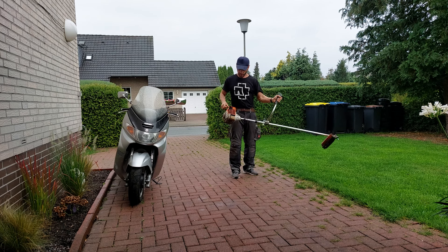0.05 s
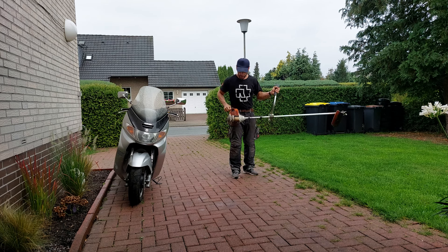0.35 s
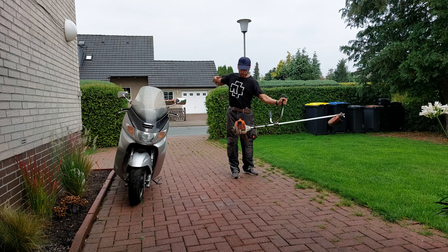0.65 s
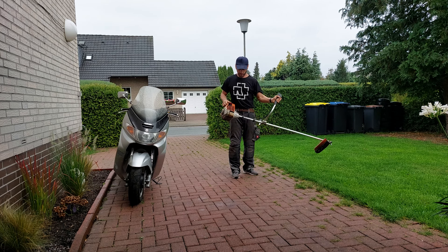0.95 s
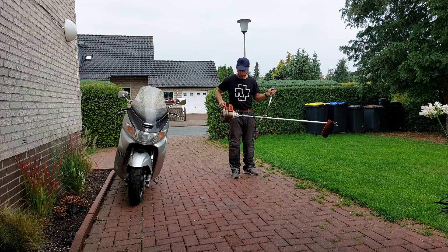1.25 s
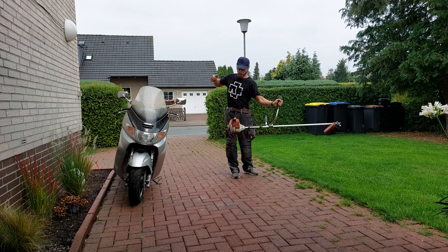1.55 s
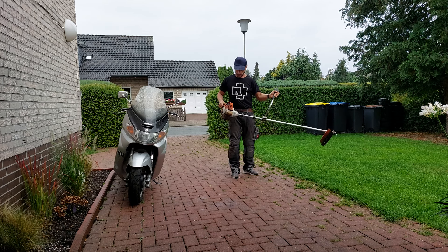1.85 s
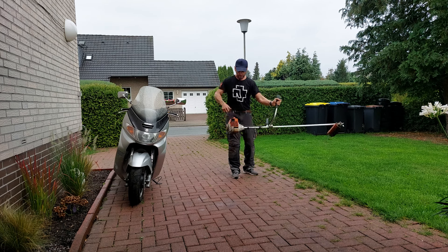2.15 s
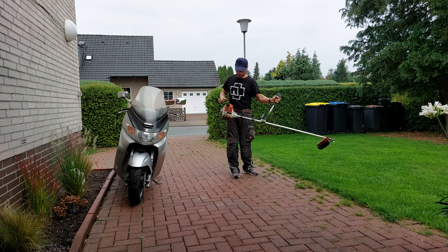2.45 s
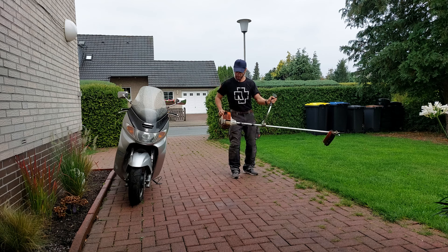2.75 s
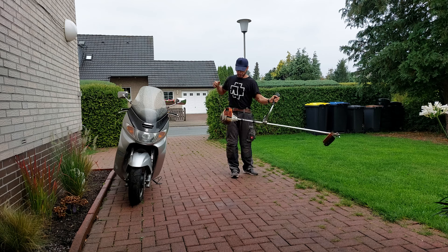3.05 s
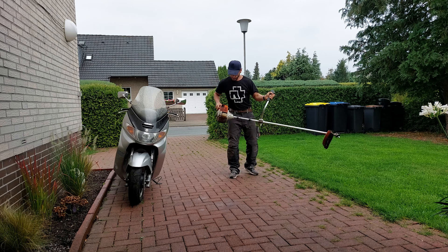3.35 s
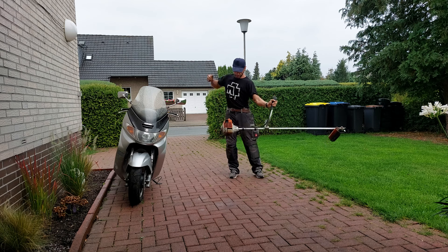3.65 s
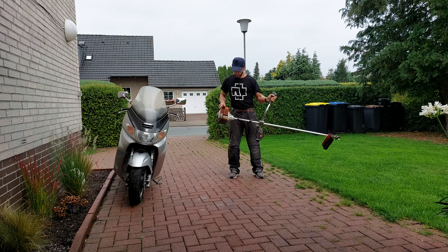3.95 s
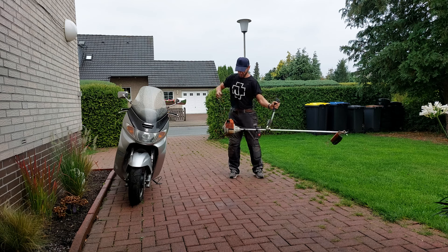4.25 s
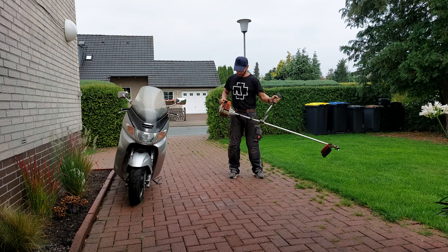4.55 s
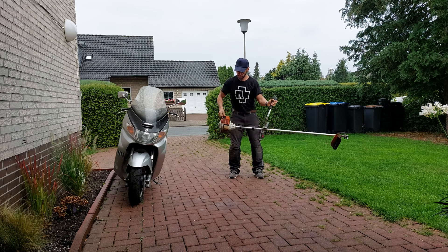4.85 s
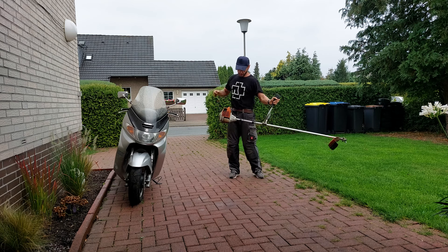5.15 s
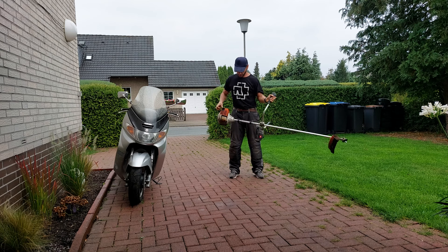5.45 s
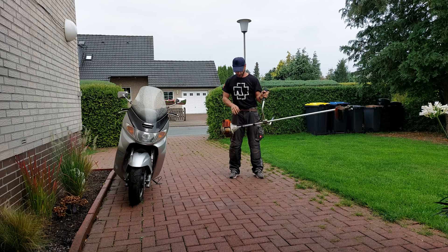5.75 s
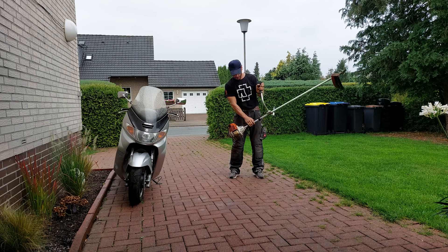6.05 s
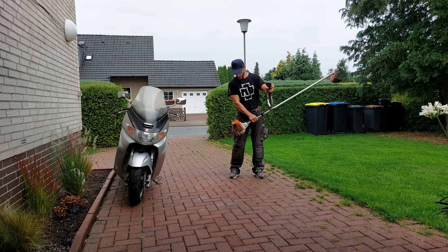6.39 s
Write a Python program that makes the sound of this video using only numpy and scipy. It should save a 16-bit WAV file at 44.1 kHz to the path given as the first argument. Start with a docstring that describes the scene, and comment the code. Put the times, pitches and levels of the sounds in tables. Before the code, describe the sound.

Repeated starter cord pulls on a brushcutter give short, airy puffs and a rattling rewind, without the engine catching, over faint traffic.

```python
"""A brushcutter's cold two-stroke engine is pull-started again and again and never fires.
On each pull the pawls (small catches) grab the flywheel, the rope whirrs, and the piston pumps two
strong puffs a turn through the muffler. Then a spring rewinds the rope and the handle knocks home.
Cord and harness rustle, house walls echo around the paved yard, and distant traffic slowly swells."""
import sys
import numpy as np
from scipy import signal
from scipy.fft import rfft, irfft, next_fast_len
from scipy.io import wavfile
from scipy.ndimage import map_coordinates

SR = 44100
rng = np.random.default_rng(int(sys.argv[2]) if len(sys.argv) > 2 else 0)


def wrap_up_sound(samples):
    """Save the sound to the file named by the first command line argument, as 16-bit audio."""
    columns = np.atleast_2d(samples).T
    # keep every value between -1 and 1, then stretch to whole-number steps
    tamed = np.clip(columns, -1, 1)
    steps = np.round(tamed * 32767).astype(np.int16)
    wavfile.write(sys.argv[1], SR, steps)


N = 287532


def amp(db):
    """Turn decibels into a gain."""
    return 10 ** (np.asarray(db) / 20)

def unit(x):
    """Scale a signal to an average (rms) level of 1."""
    return x / np.sqrt(np.mean(x ** 2) + 1e-20)

def along(points, hz):
    """Read between the rows of a (frequency, value) table, on a log frequency scale."""
    freqs, values = np.transpose(points)
    return np.interp(np.log(hz + 1), np.log(freqs), values)

def wobble(rate, size):
    """A smooth curve through `rate` random values a second."""
    steps = np.arange(0, size * rate / SR + 1, 1 / 8)
    values = rng.standard_normal(int(size * rate / SR) + 4)
    return np.interp(np.arange(size) * rate / SR, steps, map_coordinates(values, [steps]))

def filtered(x, response):
    """Scale each frequency in x by response(frequency)."""
    size = x.shape[-1]
    padded = next_fast_len(size + 8192)
    return irfft(rfft(x, padded) * response(np.fft.rfftfreq(padded, 1 / SR)), padded)[..., :size]

def ring(spectrum, size=8192):
    """How a body with this spectrum rings after one tap, with a peak of 1."""
    cepstrum = irfft(np.log(amp(along(spectrum, np.fft.rfftfreq(size, 1 / SR))) + 1e-6))
    cepstrum[1:size // 2] *= 2  # folding it puts all the ringing after the tap
    cepstrum[size // 2 + 1:] = 0
    response = irfft(np.exp(rfft(cepstrum)))
    return response / np.abs(response).max()

# How alike left and right are: (frequency [Hz], likeness [0 to 1])
STEREO_LIKENESS = [(60, .98), (130, 0.93), (290, 0.84), (640, 0.26), (1400, 0), (3100, 0.44), (7000, 0)]
def noise(spectrum, size):
    """Stereo noise of level 1, alike on both sides in the bass and mostly unrelated in the treble."""
    def shape(hz):
        angle = np.arccos(np.clip(along(STEREO_LIKENESS, hz), -1, 1)) / 2
        return amp(along(spectrum, hz)) * [np.cos(angle), np.sin(angle)]
    mid, side = filtered(rng.standard_normal((2, size)), shape)
    return unit(np.array([mid + side, mid - side]))

def fuzzy_tone(hz, width, size):
    """A narrow band of noise around a pitch, at level 1."""
    phase = 2 * np.pi * np.cumsum(hz * np.ones(size)) / SR
    return unit(wobble(width, size) * np.cos(phase) + wobble(width, size) * np.sin(phase))

def fade(t, t60):
    """Start at t = 0 and die away by 60 dB every t60 seconds (the fade time)."""
    return (t >= 0) * np.exp(-np.log(1000) * np.abs(t) / t60)

def swell(t, peak, width):
    """A smooth rise and fall, 1 at the peak."""
    return np.exp(-((t - peak) / width) ** 2)

def add(track, s, x):
    """Mix x into the track from s seconds on."""
    start = round(s * SR)
    x = x[:, max(-start, 0):max(N - start, 0)]
    track[:, max(start, 0):][:, :x.shape[1]] += x

# How long the yard echoes: (frequency [Hz], fade time [s])
TAIL_FADE = [(100, 0.74), (300, 0.49), (1200, 0.34), (5000, 0.44), (14000, 0.29)]
# The echo's tail, and the single echo off the house front: (frequency [Hz], level [dB])
TAIL_TONE = [(100, -1), (350, -3.5), (900, 0.5), (3000, -0.5), (12000, -5)]
HOUSE_TONE = [(300, -18), (700, -2), (1200, -17), (2500, -39), (6000, -40)]
def yard(x, build_s=.0074, house_delay_s=.0285):
    """Add a dull echo off the house and a soft, fading tail of yard echo."""
    hz, t, spectra = signal.stft(noise([(1, 0)], SR * 3 // 4), SR, nperseg=256)
    t60 = along(TAIL_FADE, hz)[:, None]
    gain = amp(along(TAIL_TONE, hz))[:, None] * np.sqrt(2 * np.log(1000) / (t60 * SR))
    build_up = 1 - np.exp(-(t / build_s) ** 2)
    tail = signal.istft(spectra * gain * fade(t, t60) * build_up, SR, nperseg=256)[1]
    echo = filtered(x, lambda f: amp(along(HOUSE_TONE, f)) * np.exp(-2j * np.pi * f * house_delay_s))
    return x + echo + signal.fftconvolve(x, tail, axes=1)[:, :x.shape[1]]


# Each pull has its own clock t, 0 at its first full puff. Times and speeds within a pull
# are given on that clock, which the pull's stretch makes a little faster.
LEAD_S, TOP_TURNS_PER_S = .07, 38.7
def onset(t, attack_s):
    """A straight rise from 0 to 1 as the pull starts."""
    return np.clip((t + LEAD_S) / attack_s, 0, 1)

def crank_speed(t, first_puff_speed=30.2, spin_up=215, let_go_s=.092, coast_s=.178):
    """Turns a second: the arm spins the crank up to top speed, then it coasts against compression."""
    driven = np.clip(first_puff_speed + spin_up * t, 1, TOP_TURNS_PER_S)
    return driven * np.exp(-np.maximum(t - let_go_s, 0) / coast_s)

# Air through the muffler, and air spitting through the first port: (frequency [Hz], level [dB])
MUFFLER_TONE = [(28, -44), (50, -13.5), (76, 2), (96, -8), (118, 0), (148, -0.5), (225, -0.5), (280, -1),
                (340, 0), (440, -4.5), (510, -20), (950, -20.5), (1900, -41), (6000, -95)]
SPIT_TONE = [(1500, -48), (3500, 1), (7000, 0.5), (13000, 9), (16000, 0)]
def piston(t, turns, effort_db):
    """Each turn three ports (openings) gulp air through the muffler in order; the first also spits."""
    puffs, spits = np.zeros((2, len(t)))
    for part_of_turn, db, leaky in [(0, 0, False), (.36, 0, True), (.5, -10, True)]:
        opens = np.flatnonzero(np.diff(np.floor(turns - part_of_turn)) > 0)
        # on a slow turn, pressure leaks away before the later ports open
        leak_db = leaky * np.interp(t[opens], [.11, .2], [0, -4])
        uneven_db = rng.normal(0, .23, 32)[:len(opens)]
        puffs[opens] += amp(effort_db[opens] + db + leak_db + uneven_db)
    for i in np.flatnonzero(np.diff(np.floor(turns)) > 0):
        coast_db = np.interp(t[i], [.11, .14], [0, -6])  # a coasting crank spits less
        spits += amp(effort_db[i] + coast_db) * fade(t - t[i] - .003, t60=.039)
    # the minus sign: an unfired cylinder sucks first, then the air rebounds
    thumps = -signal.fftconvolve(puffs, ring(MUFFLER_TONE))[:len(t)]
    churn = amp(effort_db - 34) * noise(MUFFLER_TONE, len(t))  # swirling air between the puffs
    return amp(-12) * thumps + churn + amp(-33) * spits * noise(SPIT_TONE, len(t))

# The pulley's rattle, and the rope's hiss (also used for scrapes and cracks):
# (frequency [Hz], level [dB])
RATTLE_TONE = [(300, -1), (520, 0), (800, -2), (1150, -6), (1400, -2), (1750, -4), (2050, -14.5),
               (3000, -17.5), (6000, -37.5)]
HISS_TONE = [(1000, -28), (2400, -2), (3300, -5.5), (4500, 1), (6000, -2.5), (7200, -2), (9000, -5.5),
             (12000, -5), (16000, -15)]
def starter(t, speed, rattle_db, hiss_db, rewind_db, ticks_per_s=90, song_hz=993.4, rise_hz=112.1):
    """The rope hisses out and back through its guide; the pulley chatters and sings; loose pawls tick."""
    size = len(t)
    octaves = np.log2(speed / TOP_TURNS_PER_S)  # a slower pull is quieter
    draw = onset(t, .026) * fade(np.maximum(t - .097, 0), t60=.14)
    rewind = swell(t, peak=.208, width=.075)  # the spring's speed
    rope_zip = amp(-44.5) * swell(t, peak=.135, width=.02)  # the last of the rope leaves the pulley
    rattle_gain = np.hypot(draw * amp(-32.5 + 11 * octaves), rewind * amp(-34.5 + rewind_db))
    outward_hiss = np.hypot(draw * amp(-41.5 + 9 * octaves), rope_zip)
    hiss_gain = np.hypot(outward_hiss, rewind * amp(-46.5 + rewind_db))

    chatter = wobble(261.1, size)
    contacts = (rng.random(size) < ticks_per_s / SR) * rng.random(size)
    one_tick = fade(np.arange(SR // 10) / SR, t60=.034)
    ticks = 1 + amp(1) * signal.fftconvolve(contacts, one_tick)[:size]
    rattle = amp(rattle_db) * rattle_gain * unit(ticks * amp(3.5 * chatter) * noise(RATTLE_TONE, size))
    hiss = amp(hiss_db) * hiss_gain * unit(ticks * amp(1.7 * chatter) * noise(HISS_TONE, size))

    flutter = 1 + .0358 * wobble(34.81, size)
    song = fuzzy_tone((song_hz + rise_hz * rewind) * flutter, 150.7, size)
    return rattle + hiss + amp(-38.5) * swell(t, peak=.13, width=.14) * song

# The pulls on the rope:
# (time of first full puff [s], stretch [factor], puffs [dB], rattle [dB], hiss [dB], rewind [dB])
ROPE_PULLS = [(-.262, 0.96, 0.5, 1.5, 2, 1), (.649, .9, 3, 2, -3.5, 0), (1.540, 0.99, 2, .5, -1.5, -0.5),
              (2.274, .94, 2, 0, -1.5, .5), (2.952, 0.95, .5, 1, -2, -1.5), (3.650, .998, 1, -.5, -0.5, 0),
              (4.323, 0.97, 1.5, -0.5, -2.5, 2), (5.008, .95, 1, 0.5, -1, 0)]
def pulls(port_lead_s=.0024, halt_s=.413, braking_s=.076, weak_below_speed=27.2):
    """Each pull spins the crank, which drives the piston and the starter and coasts to a halt."""
    track = np.zeros((2, N))
    for s, stretch, puff_db, rattle_db, hiss_db, rewind_db in ROPE_PULLS:
        t = (np.arange(SR * 7 // 8) / SR - LEAD_S) / stretch
        speed = crank_speed(t)
        turns = np.cumsum(speed) / (SR * stretch)
        turns -= np.interp(0, t, turns)
        # the puffs build as the rope takes the load, and weaken once the crank is slow
        load_db = 20 * np.log10(onset(t, .089) + 1e-6)
        weak_db = 15.5 * np.minimum(np.log2(speed / weak_below_speed), 0)
        effort_db = puff_db - 3 + load_db + weak_db
        moving = np.clip((halt_s - t) / braking_s, 0, 1)
        sound = piston(t, turns, effort_db) + starter(t, speed, rattle_db, hiss_db, rewind_db)
        add(track, s - LEAD_S - port_lead_s, yard(sound * moving))
    return track

# The road's low rumble and its tyre noise: (frequency [Hz], level [dB])
RUMBLE_TONE = [(20, -46), (40, -17), (52, -10), (72, -1.5), (100, -3), (150, -11.5), (235, -2), (335, -8.5),
               (450, -15.5), (800, -32), (2000, -84)]
TYRE_TONE = [(150, -43), (400, -9.5), (600, -4.5), (1000, -7), (1700, -12.5), (2500, -23), (4000, -32.5),
             (8000, -35), (13000, -37.5), (16000, -74)]
def traffic(nearest_s=5.35, pass_s=5.65, pass_width_s=.32, drone_hz=250):
    """A far road grows louder until its traffic is nearest, then holds; one droning engine passes."""
    t = np.arange(N) / SR
    seconds_to_go = np.maximum(nearest_s - t, 0)
    rumble = amp(-47.5 - 4.5 * seconds_to_go + 1.14 * wobble(9, N)) * noise(RUMBLE_TONE, N)
    tyres = amp(-55 - 1.77 * seconds_to_go + wobble(2.71, N)) * noise(TYRE_TONE, N)
    nearness = 1 / (1 + ((t - pass_s) / pass_width_s) ** 2)
    engine = nearness * amp(-46.5 + 4 * wobble(15, N)) * fuzzy_tone(drone_hz, 65, N)
    return rumble + tyres + engine

# The low, middle and high notes of the engine's housing: (pitch [Hz], width [Hz], level [dB])
HOUSING_NOTES = [(774, 227, -4.5), (1131, 223, 1.5), (1669, 264, 8)]
def housing_hit(notes_db, ring_db, ring_t60, clack_db, clack_t60, crack_db, crack_t60, attack_s):
    """A hit makes the housing ring briefly, with a dull clack and a bright crack."""
    t = np.arange(SR // 2) / SR
    notes = sum(amp(db + strength_db) * unit(fade(t, ring_t60) * fuzzy_tone(hz, width, len(t)))
                for (hz, width, db), strength_db in zip(HOUSING_NOTES, notes_db))
    body = amp(ring_db) * notes + amp(clack_db) * clack(t, clack_t60)
    crack = amp(crack_db) * fade(t, crack_t60) * noise(HISS_TONE, len(t))
    return yard((1 - np.exp(-t / attack_s)) * (body + crack))

# The dull part of a hit: (frequency [Hz], level [dB])
CLACK_TONE = [(300, -16), (600, -8), (850, -9), (1150, -8.5), (1450, 1.5), (1800, -6), (2300, -10.5),
              (3200, -15.5), (6000, -32)]
def clack(t, t60):
    """Two parts meet in a short burst of dull noise."""
    return fade(t, t60) * noise(CLACK_TONE, len(t))

# The handle's knocks and taps: (time [s], level [dB], ring [dB], crack [dB])
HANDLE_KNOCKS = [(.076, -33, -18, -14), (1.383, -58, -10, -25), (1.813, -22.5, -15.5, -10.5),
                 (2.58, -22.5, -21, -17), (3.258, -18.5, -20.5, -27), (3.968, -24, -17.5, -20.5),
                 (4.614, -20.5, -21, -20.5)]
# How hard it strikes the housing's notes: (low [dB], middle [dB], high [dB])
KNOCK_STRENGTHS = [-4.5, -18.5, -19.5]
def handle_knocks(lead_s=.0003):
    """The rewound handle hits the housing, short and hard."""
    track = np.zeros((2, N))
    for s, db, ring_db, crack_db in HANDLE_KNOCKS:
        hit = housing_hit(KNOCK_STRENGTHS, ring_db, ring_t60=.025, clack_db=-7, clack_t60=.044,
                          crack_db=crack_db, crack_t60=.052, attack_s=.00036)
        add(track, s - lead_s, amp(db) * hit)
    return track

# The pawls catch, the last time on a mere tug:
# (time [s], level [dB], ring [dB], crack [dB], fade length [factor])
PAWL_CATCHES = [(.569, -40, -16, -9.5, 0.91), (1.47, -22.5, -20.5, -9, 1), (2.204, -22.5, -19, -10, .9),
                (2.885, -18.5, -20.5, -15, 0.97), (3.584, -20, -16, -13, 1), (4.2524, -21, -20, -10, 1),
                (4.9357, -25, -16, -8.5, 1), (5.634, -18, -15.5, -17, 0.63)]
# How hard they strike the housing's notes: (low [dB], middle [dB], high [dB])
PAWL_STRENGTHS = [-13, -10, -22]
def pawls(lead_s=.0005):
    """The pawls fly out and scrape into the flywheel as a pull begins."""
    track = np.zeros((2, N))
    for s, db, ring_db, crack_db, length in PAWL_CATCHES:
        hit = housing_hit(PAWL_STRENGTHS, ring_db, ring_t60=.058 * length,
                          clack_db=-9, clack_t60=.11 * length,
                          crack_db=crack_db, crack_t60=.12 * length, attack_s=.0014)
        add(track, s - lead_s, amp(db) * hit)
    return track

def rubs(rows, spectrum, attack_s):
    """Rubbing makes short bursts of noise that echo in the yard."""
    envelope, t = np.zeros((1, N)), np.arange(SR // 2) / SR
    for s, db, t60 in rows:
        add(envelope, s, amp(db) * (1 - np.exp(-t / attack_s)) * fade(t, t60)[None])
    return yard(envelope * noise(spectrum, N))

# The rope's scrapes: (time [s], level [dB], fade time [s])
ROPE_SCRAPES = [(.725, -25, 0.084), (.776, -31, 0.035), (.881, -27, 0.037), (1.616, -21.5, 0.034),
                (1.702, -30.5, 0.042), (2.365, -25, 0.057), (3.041, -26, 0.045), (3.187, -33.5, 0.055)]
def rope_scrapes():
    """The rope rubs against its guide."""
    return rubs(ROPE_SCRAPES, HISS_TONE, attack_s=.0033)

# The clearest rustles: (time [s], level [dB], fade time [s])
HARNESS_RUSTLES = [(1.002, -52, 0.16), (1.975, -52, 0.087), (2.125, -65, 0.47), (2.65, -46, 0.077),
                   (4.165, -64, 0.14), (4.74, -58.5, 0.15), (6.335, -63, .25)]
# Their tone: (frequency [Hz], level [dB])
RUSTLE_TONE = [(1200, -17), (2800, 2), (5000, 3.5), (7500, -4), (10000, -6), (16000, -35)]
def harness(fidgets_per_s=4.2):
    """Cord and harness rustle now and then, with fainter, softer fidgets at random."""
    times = np.cumsum(rng.exponential(1 / fidgets_per_s, size=64))
    levels_db = rng.normal(-86, 2, size=64)
    fidgets = [(s, db, .2) for s, db in zip(times, levels_db) if s < N / SR]
    rustles = rubs(HARNESS_RUSTLES, RUSTLE_TONE, attack_s=.0035)
    return rustles + rubs(fidgets, RUSTLE_TONE, attack_s=.023)

def scene():
    """The brushcutter in the yard, over the traffic."""
    return pulls() + pawls() + handle_knocks() + rope_scrapes() + harness() + traffic()

# How much louder the left side is than the right: (frequency [Hz], level [dB])
LEFT_BOOST = [(60, -3), (110, 5), (200, -4.5), (380, 1.5), (700, 1), (1300, 4.5), (2400, 7), (4000, 9),
              (6300, 26.5), (10000, 14.5), (15000, 13)]
def record(dry, left_lead_s=.00005, top_hz=16000):
    """Sound reaches the left microphone first; the right is shaded and dull. The top treble is cut."""
    def microphones(hz):
        ratio = amp(along(LEFT_BOOST, hz))
        left = ratio * np.exp(2j * np.pi * hz * left_lead_s)
        return np.array([left, np.ones_like(ratio)]) * np.sqrt(2 / (1 + ratio ** 2))
    stereo = filtered(dry, microphones)
    return filtered(stereo, lambda hz: 1 / (1 + (hz / top_hz) ** 160))


dry = scene()
out = record(dry)
wrap_up_sound(out)
```